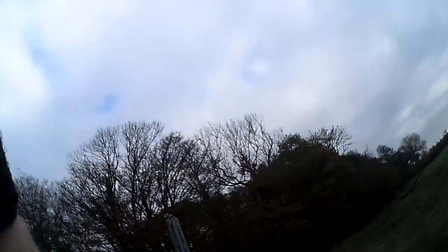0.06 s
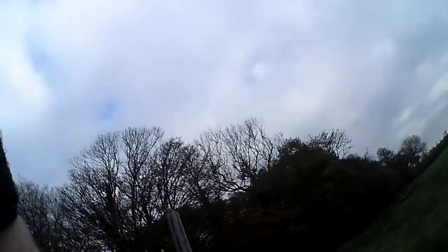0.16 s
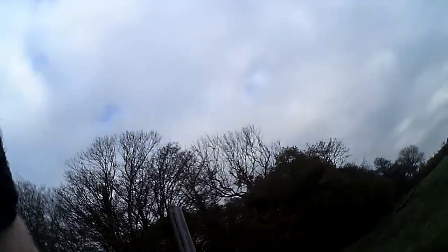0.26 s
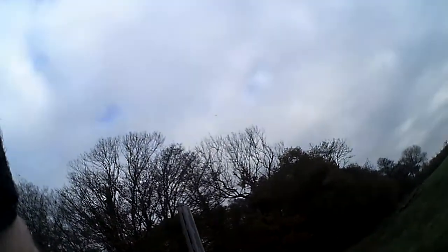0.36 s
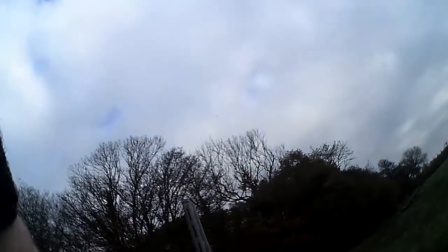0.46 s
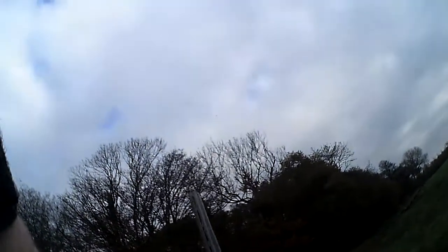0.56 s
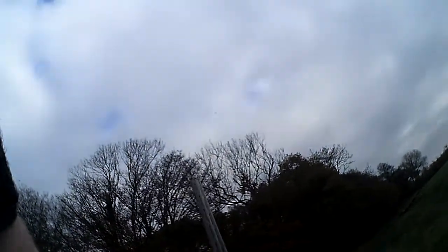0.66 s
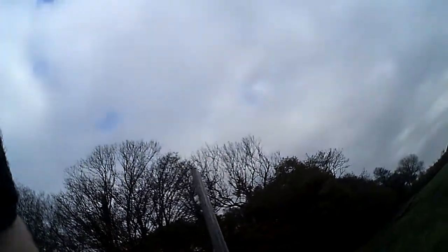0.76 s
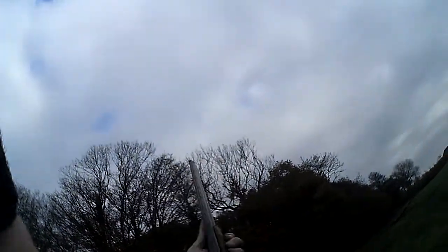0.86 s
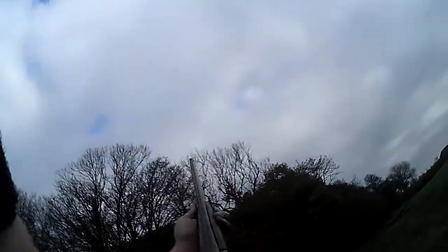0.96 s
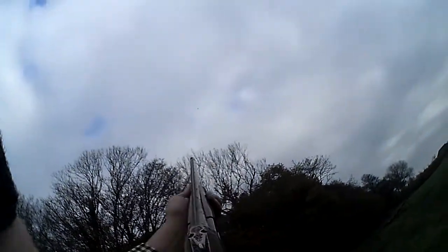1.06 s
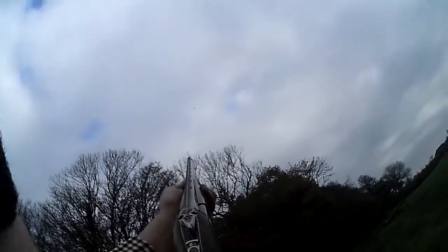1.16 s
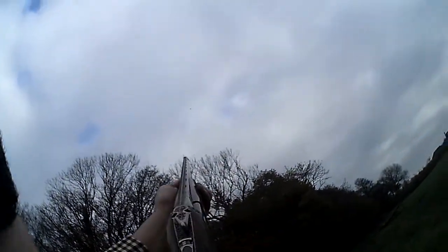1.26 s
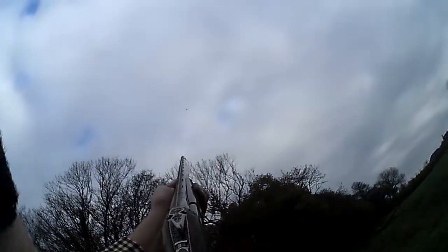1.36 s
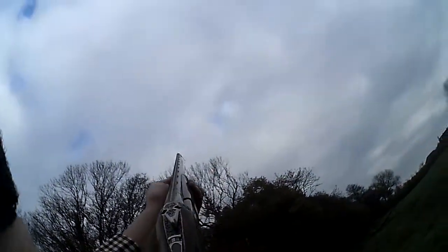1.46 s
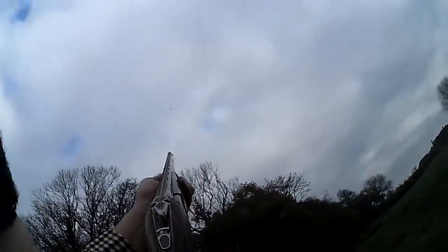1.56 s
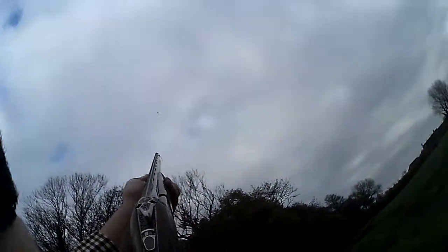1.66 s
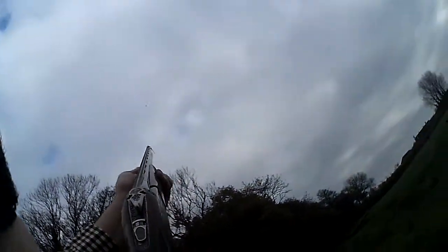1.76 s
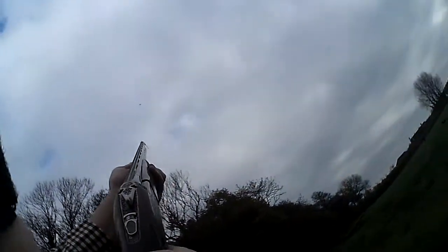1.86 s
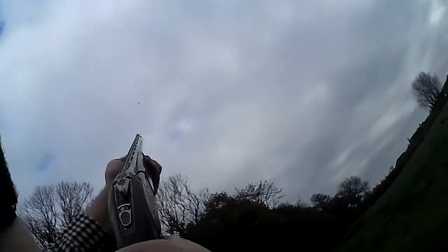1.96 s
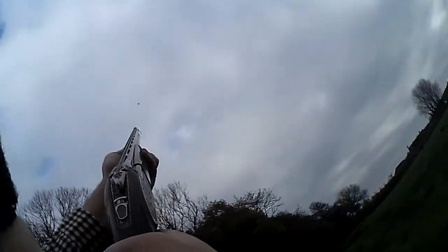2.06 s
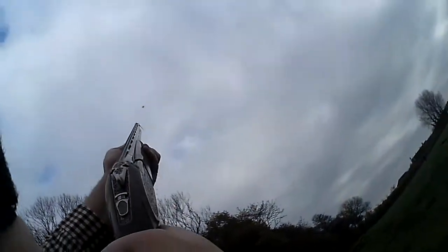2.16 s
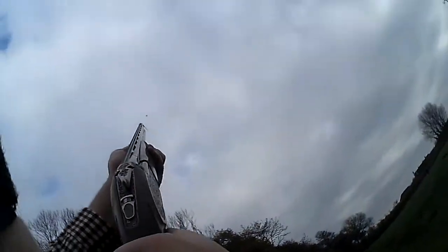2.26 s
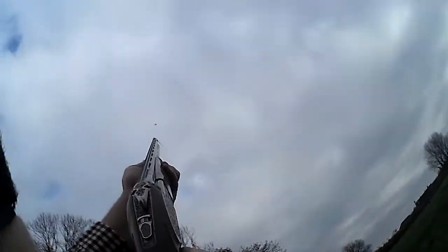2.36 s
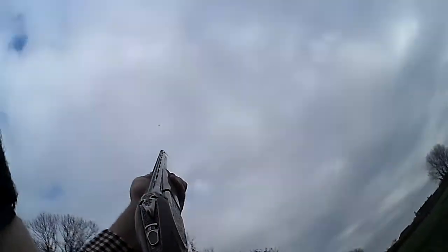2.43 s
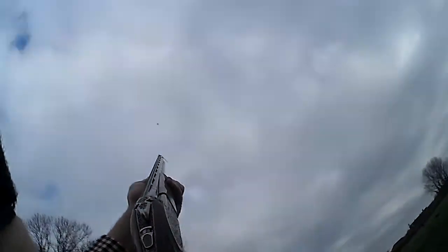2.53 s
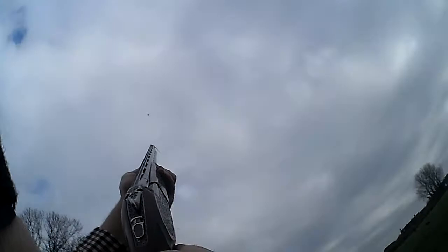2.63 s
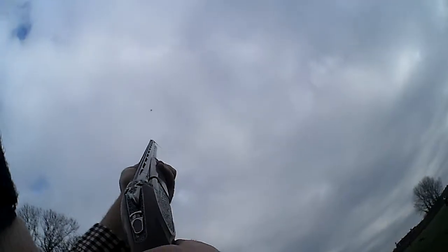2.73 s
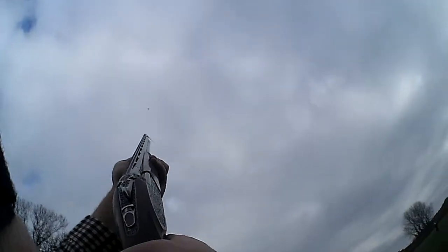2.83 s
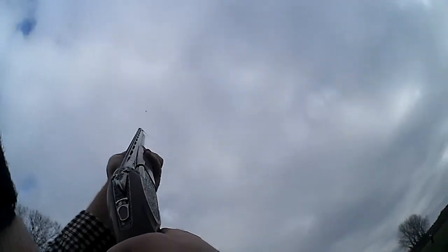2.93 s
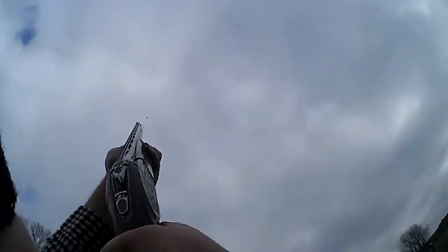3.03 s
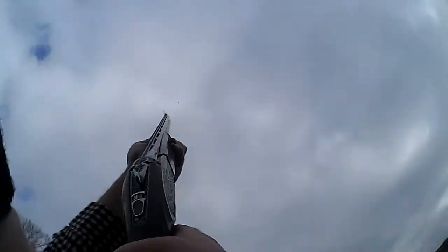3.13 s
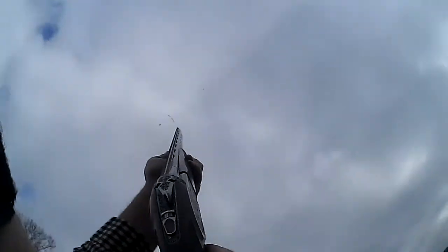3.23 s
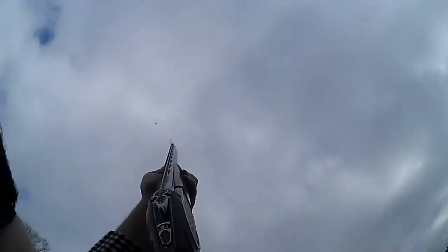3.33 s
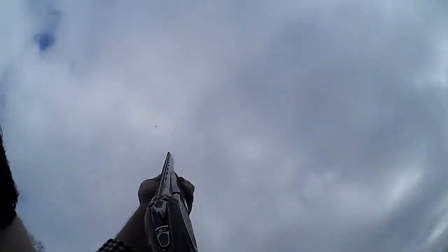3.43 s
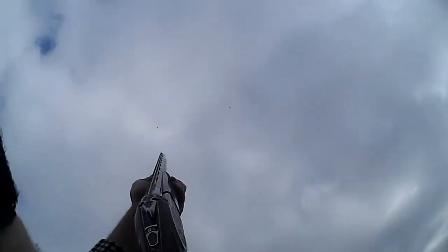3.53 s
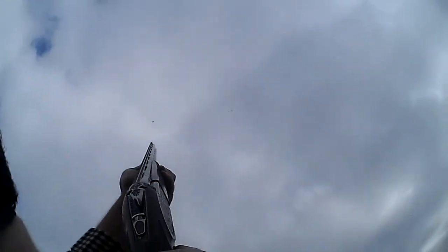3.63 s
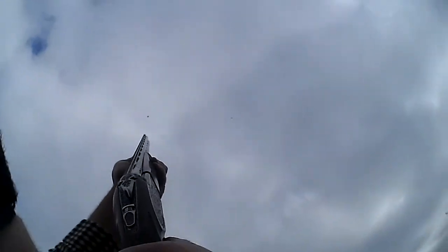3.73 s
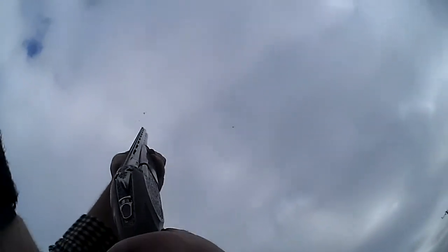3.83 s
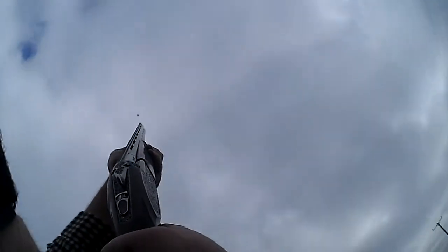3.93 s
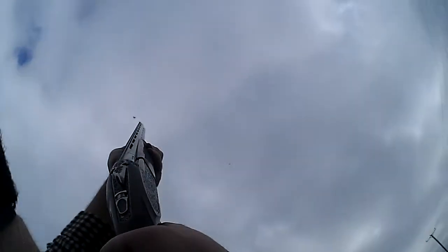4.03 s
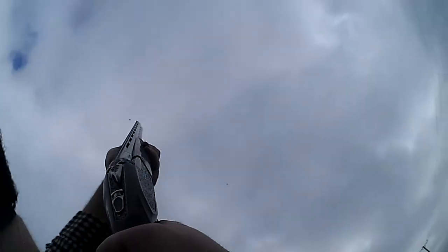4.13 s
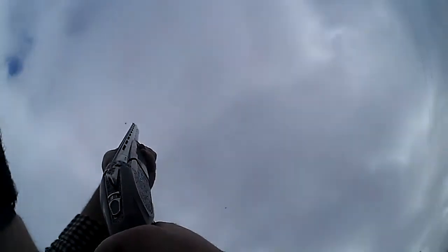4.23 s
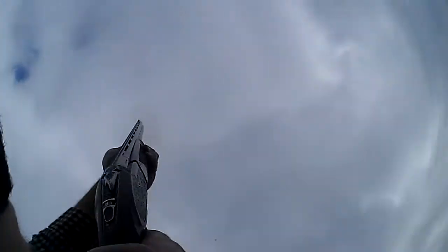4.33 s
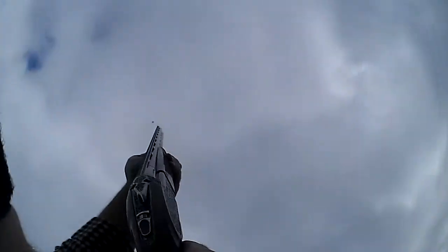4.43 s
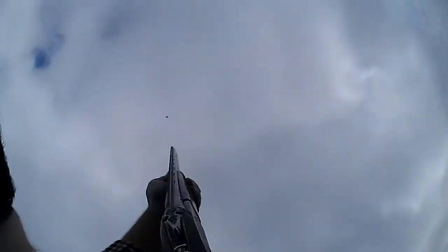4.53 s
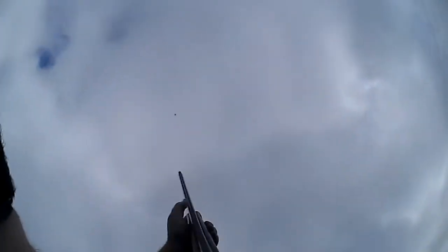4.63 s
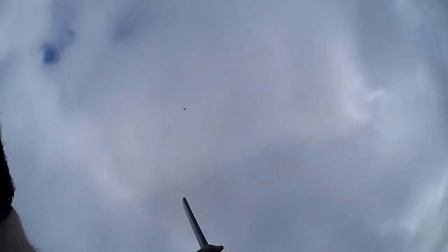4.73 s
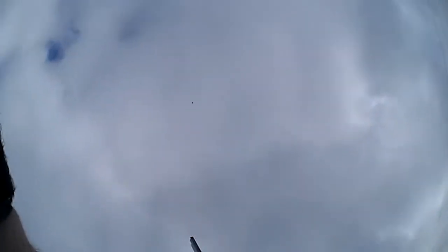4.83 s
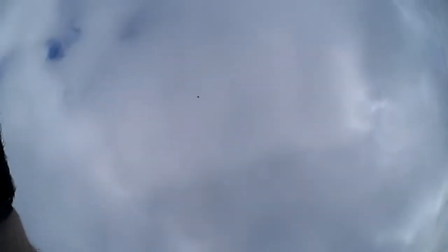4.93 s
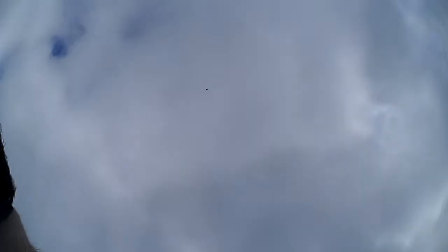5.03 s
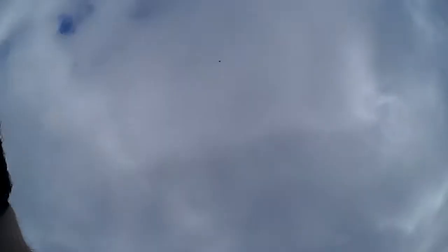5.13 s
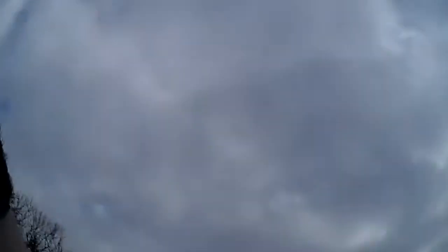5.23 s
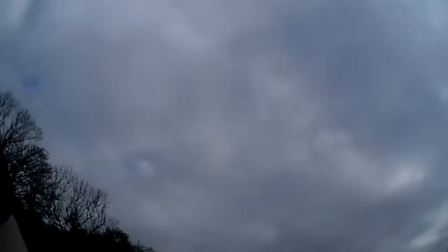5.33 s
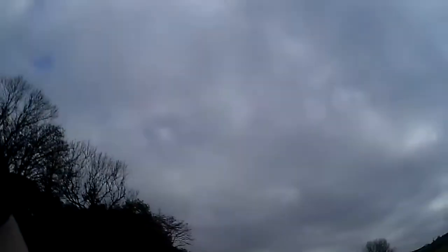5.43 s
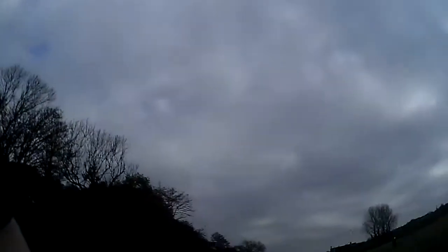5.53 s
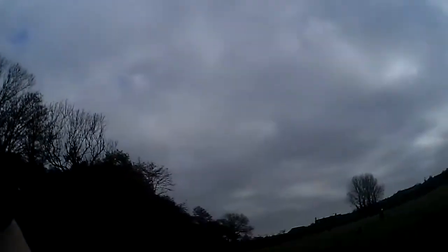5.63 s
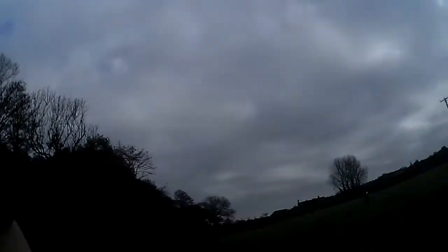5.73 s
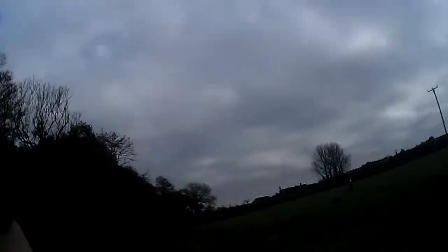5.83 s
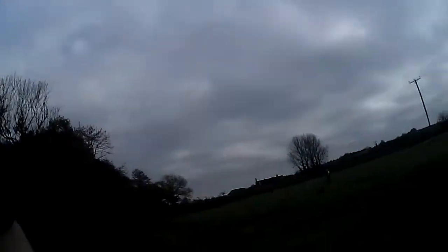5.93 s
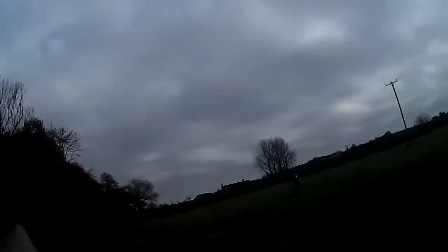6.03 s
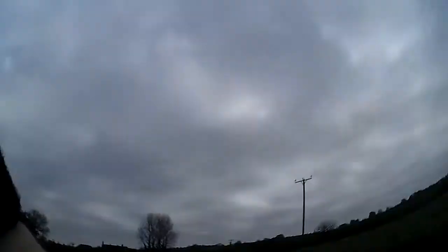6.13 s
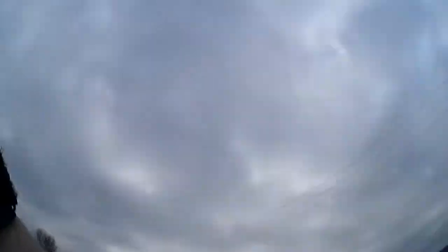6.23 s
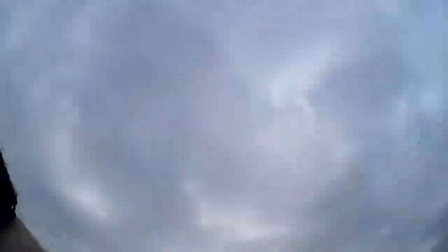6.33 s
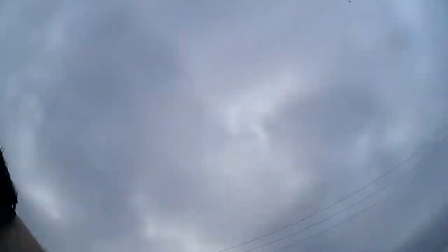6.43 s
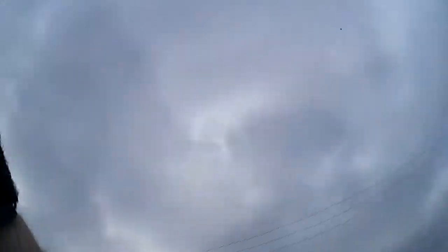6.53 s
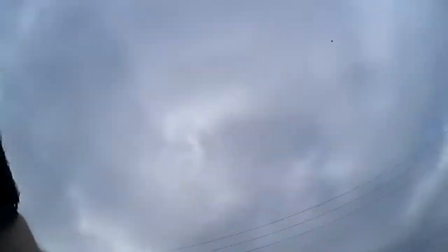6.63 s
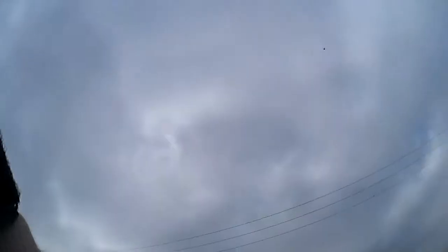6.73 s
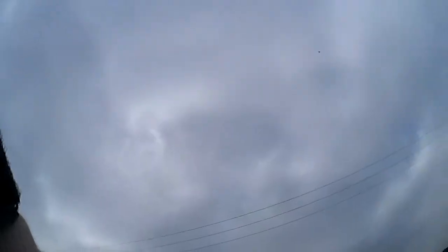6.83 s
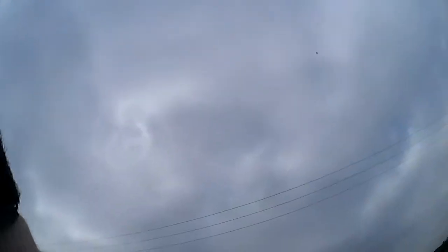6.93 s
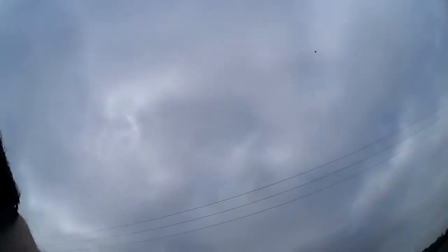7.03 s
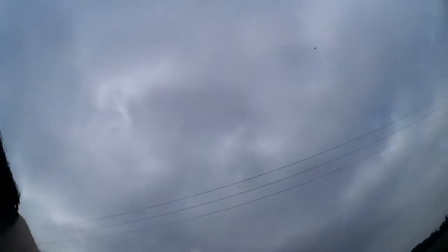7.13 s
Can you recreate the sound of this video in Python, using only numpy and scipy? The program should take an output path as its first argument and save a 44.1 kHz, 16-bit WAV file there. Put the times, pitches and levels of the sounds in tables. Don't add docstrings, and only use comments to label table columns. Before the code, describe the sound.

Outdoor field beside trees, heard through a small boxed camera fixed to a shotgun. Soft cloth bumps and hiss lead to a neighbour's two hard, ringing shots. The near gun fires soon after the second, distorted, with a knock and rattling mount, then again about a second later. Short scattered echoes fade from the trees, and the action clicks open.

```python
import sys
import numpy as np
from scipy import signal
from scipy.fft import rfft, irfft
from scipy.io import wavfile
from scipy.ndimage import uniform_filter1d

SR = 44100
rng = np.random.default_rng(int(sys.argv[2]) if len(sys.argv) > 2 else 0)


def int16_out(signal):
    q = np.round(np.clip(np.atleast_2d(signal).T, -1, 1) * 32767)
    wavfile.write(sys.argv[1], SR, q.astype(np.int16))


def field_ratio(decibels):
    return 10 ** (np.asarray(decibels, dtype=float) / 20)


N = 316544

RING_HZ, UPPER_HZ, UPPER_DB = 1931.6, 3924, -14
CRACK_DB = -18

# start_s, strength_db, treble_db
FAR_SHOTS = [
    (1.8964, 2.36, 0.95),
    (2.7444, 0, -1),
]
NEAR_SHOTS = [
    (3.0553, 1.14, 0.3),
    (4.2515, -1, 3),
]


def evened(x):
    return x / np.sqrt(np.mean(x ** 2) + 1e-20)


def add(mix, start_s, sound):
    part = mix[round(start_s * SR):][:len(sound)]
    part += sound[:len(part)]


def coloured(count, points):
    hz = np.fft.rfftfreq(count, 1 / SR)
    point_hz, level_db = np.transpose(points)
    shape = field_ratio(np.interp(np.log(hz + 1), np.log(point_hz + 1), level_db))
    return evened(irfft(rfft(rng.standard_normal(count)) * shape, count))


def resonate(x, hz, width_hz):
    r = np.exp(-np.pi * width_hz / SR)
    pole = [1, -r * np.exp(2j * np.pi * hz / SR)]
    once = signal.lfilter([1], pole, x)
    return 2 * (1 - r) ** 2 * signal.lfilter([1], pole, once).real


def front(boom_db, boom_hz, ring_db, length_ms, crack_db=CRACK_DB, ring_hz=RING_HZ, edge_samples=3.0):
    t = np.arange(1200) / SR
    edge = np.minimum(t * SR / (edge_samples + 30 * (boom_db < -10)), 1)
    rise = edge * (1 - 0.6 * np.exp(-t / 0.0026))

    sag = 24.0
    cycles = boom_hz * (1 - np.exp(-2 * sag * t)) / (2 * sag)
    boom = field_ratio(boom_db) * np.sin(2 * np.pi * cycles + 0.92)

    ring = np.sin(2 * np.pi * ring_hz * t) + field_ratio(UPPER_DB) * np.sin(2 * np.pi * UPPER_HZ * t)
    ring = field_ratio(ring_db) * (ring + field_ratio(-14.5) * np.sin(2 * np.pi * 1600 * t))
    crack = field_ratio(boom_db + crack_db) * signal.lfilter([0.4], [1, -0.7], rng.standard_normal(len(t)))

    u = t * 1000 / 0.9
    push = field_ratio(min(boom_db, -3) - 12) * (1 - u) * np.exp(-u) * edge

    boom_grip = rise / (1 + np.exp((t * 1000 - length_ms) / 1.1))
    wall_grip = rise / (1 + np.exp((t * 1000 - length_ms) / 0.29))
    return boom_grip * boom + wall_grip * (ring + crack) + push


def blast(boom_hz, ring_db, ring_hz, length_ms):
    return front(1.5, boom_hz, ring_db, length_ms, crack_db=-1, ring_hz=ring_hz)


def bounce(boom_hz, ring_db, ring_hz, length_ms):
    return front(-2.5, boom_hz, ring_db, length_ms, ring_hz=ring_hz, edge_samples=6.2)


def rattle(level_db, t60_s, thud_db):
    # pitch_hz, level_db (per Hz)
    rattle_colour = [(35, -48), (60, -14.5), (212, -20), (515, -1), (968, -21.5), (1440, -15.5), (1860, -5),
                     (2970, -34), (3850, -20), (4420, -25.5), (8920, -36), (11500, -32.5), (16000, -38)]
    t = np.arange(16384) / SR
    thud = field_ratio(thud_db - 60 * t / 0.4) * np.sin(2 * np.pi * 33 * t) * np.minimum(t / 0.06, 1)
    shake = field_ratio(level_db - 60 * t / t60_s) * coloured(len(t), rattle_colour)
    clumps = evened(uniform_filter1d(rng.standard_normal(len(t)), size=90))
    shake = shake * field_ratio(1.9 * clumps - 1.1)
    return shake * np.minimum(t / 0.0012, 1) + thud


def puff(level_db, centre_hz, width_hz, length_ms):
    count = round(length_ms * SR / 1000)
    burst = evened(resonate(rng.standard_normal(16384), centre_hz, width_hz))[-count:]
    return field_ratio(level_db) * burst * signal.windows.tukey(count, 0.5)


def click(level_db, ring_hz, upper_db, t60_s):
    t = np.arange(3000) / SR

    def rough_ring(hz):
        roughness = evened(uniform_filter1d(rng.standard_normal(len(t)), size=50))
        return (1 + 0.42 * roughness) * np.sin(2 * np.pi * hz * t)

    rings = rough_ring(ring_hz) + field_ratio(upper_db) * rough_ring(3843)
    return field_ratio(level_db - 60 * t / t60_s) * np.minimum(t / 0.00086, 1) * rings


def echo(level_db, pitch_hz, t60_s=0.035, ring_db=-40):
    t = np.arange(4000) / SR
    wall_hz = RING_HZ * rng.uniform(0.94, 1.02)
    swing = np.sin(2 * np.pi * pitch_hz * t) + field_ratio(ring_db) * np.sin(2 * np.pi * wall_hz * t)
    return field_ratio(level_db + 6.5 - 60 * t / t60_s) * np.minimum(t / (0.1 * t60_s), 1) * swing


def trunks():
    # delay_s, first_shot_db, second_shot_db, pitch_hz, wall_ring_db
    far_trunks = [(.045, -41.5, -38, 394, -7), (.079, -29.5, -29, 558, -6), (.086, -30, -27, 532, -13),
                  (.103, -31, -35, 440, 4), (.122, -35, -42, 432, -13), (.133, -34, -26, 620, -20),
                  (.157, -32, -28.5, 447, -7.5), (.192, -27, -38, 508, -11), (.207, -31, -39, 430, -12),
                  (.229, -27, -30, 518.6, -15), (.263, -30.5, -36, 465, -11),
                  (.282, -28.5, -36.5, 521.2, -12.5), (.318, -33, -38, 470, -8.5),
                  (.405, -41, -44, 440, -11), (.431, -36, -43, 450, -18), (.453, -39.5, -39, 463, -10),
                  (.527, -45, -44, 490, -22), (.554, -44, -47, 440, -21), (.603, -45, -54, 525, -15),
                  (.681, -48.5, -52.5, 613, -6)]
    near_trunks = [(.097, -30, -36, 420, -3), (.127, -25, -32, 473, -12), (.201, -28.5, -41, 490, -11.5),
                   (.232, -37, -38, 380, -13), (.276, -40, -52, 450, -14), (.33, -44, -43, 380, -16),
                   (.362, -48, -39, 440, -11), (.38, -39, -45, 410, -18), (.419, -40, -44.5, 490, -15),
                   (.471, -42, -48.5, 422, -5.5), (.54, -47, -47, 534, -17), (.815, -49, -57, 530, -12)]
    out = np.zeros(N)
    for shots, table in ((FAR_SHOTS, far_trunks), (NEAR_SHOTS, near_trunks)):
        for delay_s, *levels_db, pitch_hz, ring_db in table:
            for shot, level_db in zip(shots, levels_db):
                add(out, shot[0] + delay_s, echo(level_db, pitch_hz, 0.028, ring_db))
    return out


def scatter(u, edge, field_db, line_db, line_t60, deep_db, deep_t60):
    line_s, swell_s, second_s, lift_db, lift_s = edge
    field_s = 0.03
    opening = np.clip((u - field_s + 0.0088) / 0.01, 0, 1)
    field = opening * field_ratio(field_db - 60 * np.maximum(u - field_s, 0) / 0.38)

    since = np.maximum(u - line_s, 0)
    swell = np.minimum(since / swell_s, 1) ** 2
    wood = field_ratio(line_db - 60 * since / line_t60) ** 2 + field_ratio(deep_db - 60 * since / deep_t60) ** 2
    second = np.clip((u - second_s) / lift_s, 0, 1)
    lift = field_ratio(lift_db * np.sin(np.pi * second ** 0.6))
    return np.sqrt(field ** 2 + (swell * lift) ** 2 * wood)


def trees():
    # pitch_hz, width_hz, level_db
    low_modes = [(380, 230, -9), (490, 150, 2.5), (635, 145, -3.5)]
    middle_modes = [(1220, 160, -10), (1400, 260, -8), (1850, 270, 1.15), (2530, 270, -23)]
    high_modes = [(3860, 480, 1), (4400, 600, -4.5), (5660, 3100, -4), (7500, 2500, -17.5),
                  (3000, 700, -14)]
    # pitch_hz, width_hz, level_db
    low_near_modes = [(380, 210, -6.5), (470, 210, 0.5), (637, 100, -8.5)]
    middle_near_modes = [(1150, 290, -12.5), (1530, 640, -5.5), (1873, 440, 3), (2410, 450, -19)]
    # first_delay_s, swell_s, second_delay_s, lift_db, lift_length_s
    far_edge = (.064, 0.017, .19, 4, .12)
    near_edge = (0.077, 0.033, 0.336, 3.5, 0.095)
    # open_field_db, tree_line_db, tree_line_t60_s, deep_wood_db, deep_wood_t60_s
    far_wood = [
        (-46.5, -33.5, .35, -40.5, 1.7),
        (-48.5, -38.5, 0.58, -53, 2.5),
        (-60.5, -56.5, .6, -75, 2.2),
    ]
    near_wood = [
        (-35.5, -34, 0.66, -49.5, 2.5),
        (-40, -40, 0.7, -57.5, 2.6),
        (-51.5, -51, 0.56, -75, 2.2),
    ]

    lumps = evened(uniform_filter1d(rng.standard_normal(N), round(0.009 * SR)))

    def housing(modes, lumps_db):
        sound = np.zeros(N)
        for hz, width_hz, level_db in modes:
            returns = rng.standard_normal(N) * field_ratio(lumps_db * lumps)
            sound += field_ratio(level_db) * evened(resonate(returns, hz, width_hz))
        return evened(sound)

    high = housing(high_modes, 0.5)
    far_ranges = (housing(low_modes, 1.5), housing(middle_modes, 0.5), high)
    near_ranges = (housing(low_near_modes, 1.5), housing(middle_near_modes, 0.5), high)

    out, t = np.zeros(N), np.arange(N) / SR
    for shots, edge, wood, ranges in ((FAR_SHOTS, far_edge, far_wood, far_ranges),
                                      (NEAR_SHOTS, near_edge, near_wood, near_ranges)):
        for row, sound, treble in zip(wood, ranges, (0, 0.5, 1)):
            power = np.zeros(N)
            for start_s, strength_db, treble_db in shots:
                level = field_ratio(strength_db + treble * treble_db) * scatter(t - start_s, edge, *row)
                power += level ** 2
            out += np.sqrt(power) * sound
    return out


def scene():
    # start_s, boom_db, boom_hz, ring_db, length_ms
    fronts = [
        (1.8964, -1.5, 669, -12.5, 4.27),
        (2.7444, -3.5, 641.5, -4.5, 4.94),
        (3.0493, -12, 422.5, -24, 4.1),
        (4.2452, -15.5, 433.3, -20, 4.2),
    ]
    # start_s, boom_hz, ring_db, ring_hz, length_ms
    blasts = [
        (3.0553, 460, 9.5, 1942, 4.7),
        (4.2513, 418, 4.5, 1801, 3.6),
    ]
    # start_s, boom_hz, ring_db, ring_hz, length_ms
    bounces = [
        (3.0649, 520, -6.5, 1930, 3.3),
        (4.2612, 539.6, 2.5, 1802, 2.71),
    ]
    # start_s, level_db, t60_s, thud_db
    rattles = [
        (1.902, -31.5, 0.068, -59),
        (2.750, -33.5, 0.12, -61.5),
        (3.0600, -12, 0.011, -60.5),
        (3.066, -11.5, 0.1, -32),
        (4.2545, -8.5, 0.0096, -62.5),
        (4.263, -13, 0.11, -35),
    ]
    # start_s, peak_db, pitch_hz, t60_s
    thumps = [(1.8971, -18, 198, .025), (2.7449, -18.5, 200, .025), (3.052, -19.5, 184.9, .05),
              (3.054, -21.5, 135.1, 0.07), (4.249, -16, 184.6, 0.052), (4.250, -29, 280.3, .04),
              (4.265, -34.5, 110, .12), (5.565, -48, 352, .045)]
    # start_s, peak_db, pitch_hz
    cloth = [(0.017, -54, 250), (0.073, -51, 188), (0.103, -54, 232), (.118, -50.5, 210),
             (0.123, -55.5, 380), (0.204, -53.5, 268), (0.267, -59, 253), (.275, -58, 420),
             (0.331, -51, 114), (0.959, -56, 152)]
    # start_s, peak_db, ring_hz,
    # upper_ring_db, t60_s
    clicks = [(5.059, -46.5, 1903, -25, 0.025), (5.5225, -42, 2050, -20.5, .022),
              (5.528, -52, 2100, -20, 0.038), (5.5475, -44, 1960, -19, .03), (5.5515, -34, 1914, -9, 0.022),
              (5.5535, -35.5, 1940, -1, 0.03), (5.5565, -34.5, 2110, -12, 0.021),
              (5.5610, -51, 2300, -7, 0.072)]
    # start_s, level_db, centre_hz, width_hz,
    # length_ms
    snaps = [(1.8970, -30, 1260, 200, 5), (2.7450, -26, 1300, 300, 5), (4.2520, -15, 3000, 700, 4),
             (4.2625, -13, 1600, 300, 4.6), (4.2520, -20, 1080, 300, 5), (4.473, -59, 3950, 500, 8),
             (2.7455, -29, 4600, 500, 3.5), (1.8975, -22, 3370, 500, 2.6), (2.7455, -19.5, 3200, 450, 3.5),
             (3.0540, -18, 3900, 4000, 1.6), (3.0560, -19, 1090, 370, 5), (3.0570, -12, 4000, 450, 4.5),
             (4.2505, -18, 4000, 5000, 1.3), (4.2545, -20, 4400, 1600, 2.6), (3.0880, -33, 10500, 4055, 3),
             (4.3225, -39.5, 5570, 1500, 4.2), (4.3220, -43.5, 11000, 7000, 5.2),
             (4.3240, -42, 2700, 770, 4), (5.5505, -47, 5200, 7060, 4), (5.5520, -61, 8900, 9000, 9.1),
             (5.5500, -50.5, 650, 506, 9.7), (5.5510, -52.5, 2580, 460, 6), (5.5580, -65, 3900, 350, 30)]
    # start_s, level_db, centre_hz, width_hz, length_ms
    wings = [(1.6, -75, 1440, 12, 140), (1.66, -81, 1720, 50, 70), (1.58, -77, 1700, 600, 160)]
    # start_s, level_db, centre_hz, width_hz, length_ms
    hedge = [(5.12, -72, 1900, 300, 200), (5.12, -72, 600, 300, 160), (3.93, -76, 1900, 300, 200)]

    mix = trees() + trunks()
    for table, source in ((fronts, front), (blasts, blast), (bounces, bounce), (rattles, rattle),
                          (cloth + thumps, echo), (clicks, click), (snaps + wings + hedge, puff)):
        for start_s, *row in table:
            add(mix, start_s, source(*row))
    return mix[None]


def band_limit(x):
    return signal.sosfilt(signal.butter(12, 16620, fs=SR, output="sos"), x)


def record(dry):
    # pitch_hz, level_db (per Hz)
    hiss_colour = [(8.8, -29.5), (15, 3), (37, -2.5), (82, -8), (181, -14.5), (551, -18.5), (601, -19.5),
                   (2180, -25), (2840, -25.5), (5250, -27.5), (13800, -28.5), (15100, -28), (16500, -57)]
    ceiling = 0.715
    clipped = np.clip(dry, -ceiling, ceiling) + field_ratio(-60.5) * coloured(N, hiss_colour)
    lowpass = signal.firwin(95, 16050, fs=SR)
    limited = signal.oaconvolve(clipped, lowpass[None], "same")
    finished = np.clip(limited, -1.04 * ceiling, 1.04 * ceiling)
    return band_limit(finished)


dry = scene()
out = record(dry)
int16_out(out)
```